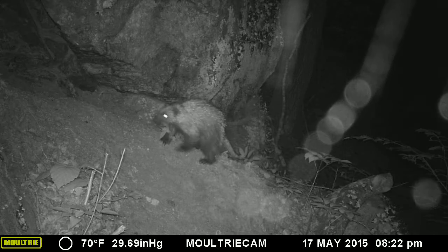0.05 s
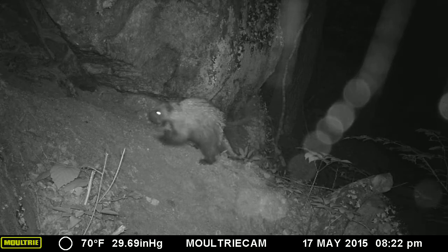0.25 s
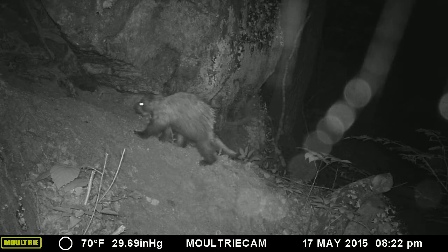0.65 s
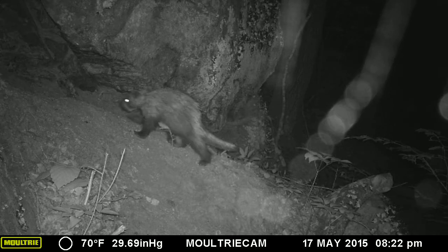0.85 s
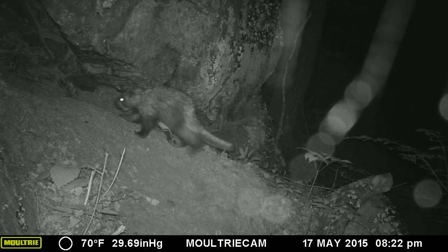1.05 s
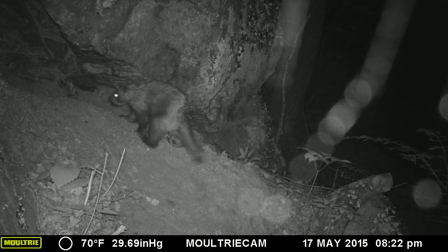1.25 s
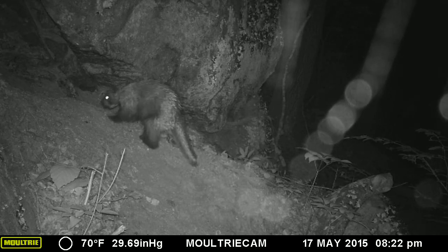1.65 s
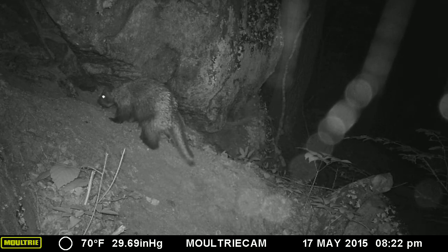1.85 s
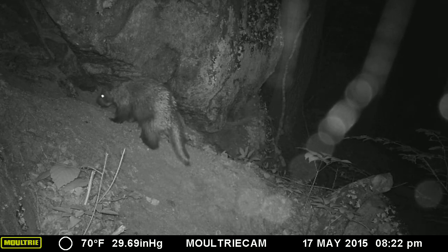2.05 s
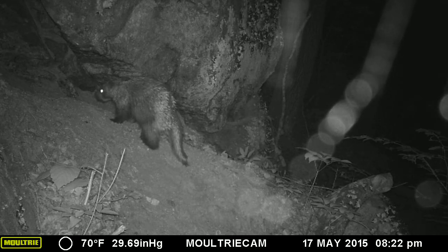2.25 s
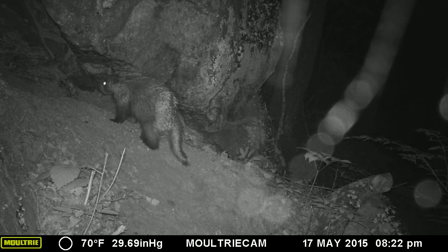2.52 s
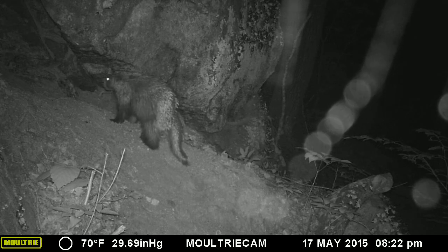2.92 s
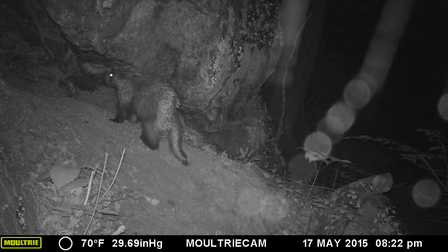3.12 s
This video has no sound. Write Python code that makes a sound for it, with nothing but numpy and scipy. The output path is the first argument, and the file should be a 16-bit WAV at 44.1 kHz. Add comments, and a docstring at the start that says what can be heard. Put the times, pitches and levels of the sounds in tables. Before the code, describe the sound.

One sharp knock on a trail camera's case stands out against quiet night woods. First, a soft buzz of electronic ticks grows for half a second, followed by a few separate clicks until about 0.8 seconds. Thin hiss, faint hollow air, low rumble and a wavering hum fade in by 1 second and stay. The knock lands at about 2.5 seconds, close and slightly overloaded, ringing briefly.

```python
"""A thin hiss and a soft buzz of ticks come first: a trail camera is waking in a still wood at night.
Its amplifier makes the hiss, and ticks each time its gain (how much it boosts the sound) steps up.
Air ringing in the camera's case fades in, along with a rumble and a low hum.
One sharp knock on the case overloads the camera, and its gain control turns everything down briefly."""
import sys
import numpy as np
from scipy import signal
from scipy.fft import rfft, irfft, next_fast_len
from scipy.io import wavfile
from scipy.ndimage import map_coordinates

SR = 44100
rng = np.random.default_rng(int(sys.argv[2]) if len(sys.argv) > 2 else 0)


def generate_wav(sig):
    """Save sig (samples, or channels by samples) to the path in sys.argv[1] as 16-bit PCM at SR."""
    pcm = np.round(np.clip(np.atleast_2d(sig).T, -1, 1) * 32767).astype(np.int16)
    wavfile.write(sys.argv[1], SR, pcm)


N = 143325


def amp(db):
    """Turn decibels into a number to multiply by."""
    return 10 ** (np.asarray(db) / 20)


def curve(points):
    """Join (time_s, value) points with straight lines, one value per sample."""
    return np.interp(np.arange(N) / SR, *np.transpose(points))


def colour(points):
    """Turn (pitch_hz, level_db) points into a function giving each pitch's strength."""
    pitch_hz, level_db = np.transpose(points)
    return lambda hz: amp(np.interp(np.log(hz + 1), np.log(pitch_hz + 1), level_db))


def filtered(x, strength):
    """Multiply each pitch in x by strength(hz)."""
    size = next_fast_len(N + SR // 2)
    return irfft(rfft(x, size) * strength(np.fft.rfftfreq(size, 1 / SR)), size)[:N]


def noise(strength):
    """Noise shaped by strength(hz), with an average power of 1."""
    x = filtered(rng.standard_normal(N), strength)
    return x / np.sqrt(np.mean(x ** 2) + 1e-20)


def wobble(per_s):
    """A smooth curve through per_s random values each second."""
    values = rng.standard_normal(int(N * per_s / SR) + 4)
    return map_coordinates(values, [np.arange(N) * per_s / SR])


def fade(t, fade_s):
    """Jump from 0 to 1 at t = 0, then die away by 60 dB every fade_s."""
    return (t >= 0) * np.exp(-np.log(1000) * np.abs(t) / fade_s)


def hiss():
    """The amplifier's own noise drops out twice, swells and settles."""
    # loudness of the hiss: time_s, level_db
    loudness = [(0, -59), (.125, -88), (.14, -59), (.218, -55.5), (.232, -90), (.255, -84), (.266, -52),
                (.35, -50.5), (.48, -40), (.72, -39.5), (.95, -46), (3.25, -46)]
    # tone of the hiss: pitch_hz, level_db
    tone = [(100, 7.5), (400, 2.5), (900, 3), (1600, -1.5), (3000, 1), (4300, 1), (5200, -0.5)]
    return amp(curve(loudness)) * noise(colour(tone))


def wake_ticks():
    """Each gain step jolts the amplifier's resting level, which settles: a buzz, then single ticks."""
    # single jumps of the gain: start_s, level_db, direction (1 up, -1 down)
    jumps = [(.1339, -34.5, 1), (0.541, -22.5, 1), (0.5836, -25, 1), (0.6474, -25.5, 1), (0.6854, -27, 1),
             (0.7581, -27, 1), (.776, -26, 1), (0.7915, -16.5, -1), (0.8054, -32, 1), (.8354, -31.5, 1)]
    count, gap_s, growth_db_per_s, settle_s = 35, .014222, 52.5, .21
    times_s = .0059 + gap_s * np.arange(count)
    levels_db = -51 + growth_db_per_s * times_s + rng.standard_normal(count)
    steps = np.zeros(N)
    steps[np.round(times_s * SR).astype(int)] = amp(levels_db)
    for start_s, level_db, direction in jumps:
        steps[round(start_s * SR)] += np.sign(direction) * amp(level_db)
    return signal.lfilter([1], [1, -np.exp(-1 / (settle_s * SR))], steps)


def night_air():
    """Faint air noise rings at a few pitches inside the hollow case."""
    # where the hollow case rings: pitch_hz, width_hz, level_db
    peaks = [(1171.6, 186, -9.5), (2067.7, 140, -0.5), (2313, 300, -16), (3552, 278, -15.5)]

    def hollow(hz):
        return np.sqrt(sum(amp(level_db) ** 2 / (1 + (2 * (hz - pitch_hz) / width_hz) ** 2) ** 1.6
                           for pitch_hz, width_hz, level_db in peaks))
    return amp(-38.5 + 1.01 * wobble(per_s=30.09)) * noise(hollow)


def rumble():
    """Deep, steady noise."""
    # tone of the rumble: pitch_hz, level_db
    tone = [(8, 1), (20, -2.5), (30, 0), (48, -11.5), (75, -7), (98, -8.5), (112, -14), (145, -18),
            (175, -24), (260, -31.5), (600, -35), (1000, -43.5), (2000, -76.5)]
    return amp(-27.5) * noise(colour(tone))


def hum():
    """One low note swells and wavers, with a faint electrical hum beside it."""
    # swells of the low note: time_s, relative_level_db
    swells = [(.5, -29.5), (.62, -29), (.75, -30), (.95, -26), (1.24, -28.5), (1.47, -28.5), (1.63, -23.5),
              (1.8, -31), (2.02, -35), (2.1, -31), (2.25, -26), (2.48, -26), (2.56, -30.5), (2.72, -24.5),
              (2.82, -22.5), (2.93, -18.5), (3.06, -26), (3.25, -25)]
    # notes of the electrical hum: pitch_hz, relative_level_db
    electric_notes = [(121, -46.5), (360, -64), (480, -68), (600, -68)]
    low_hz, waver_db = 88.1, 1.75
    t = np.arange(N) / SR
    phase = 2 * np.pi * low_hz * t + .25 * wobble(per_s=8.3)  # the pitch drifts a little
    low_note = amp(curve(swells) + waver_db * wobble(per_s=10)) * np.sin(phase)
    electric = sum(amp(db + waver_db * wobble(per_s=4.2)) * np.sin(2 * np.pi * hz * t)
                   for hz, db in electric_notes)
    return np.sqrt(2) * (low_note + electric)


def knock():
    """A hard tap on the case: it cracks and rings, with a short echo and a longer low boom."""
    # notes the struck case rings with: pitch_hz, relative_level_db, fade_s
    case_notes = [(140, -20, .05), (170, -16.5, .06), (275, -30, .24), (345, -32, .1), (640, -25, .05),
                  (1060, -24, .035), (1210, -6, .042), (1335, -41, .24), (1585, -28, .14), (1795, -26, .11),
                  (2062, -22, .07), (2724, -36, .28), (3192, -45, .42), (3650, -14, .016),
                  (4330, -16, .014), (4818, -44, .24), (5000, -14, .014)]
    # tone of the crack: pitch_hz, level_db
    crack_tone = [(100, -0.5), (400, 12.5), (800, 1.5), (1450, -11), (2000, 4), (2700, -3.5), (3700, 0.5),
                  (4400, 2.5), (5200, 1)]
    # tone of the echo among the trees: pitch_hz, level_db
    echo_tone = [(100, -6.5), (300, 2), (600, -6.5), (800, -5), (1200, -3), (1450, -8.5), (2100, -3.5),
                 (3000, -21), (5200, -24.5)]
    start_s, rise_s, boom_hz, boom_octaves = 2.529, .001, 240, .53
    t = np.arange(N) / SR - start_s
    ring = -sum(amp(db + rng.normal(0, .31)) * fade(t, fade_s) * np.sin(2 * np.pi * hz * t)
                for hz, db, fade_s in case_notes)
    ring *= amp(2) * (1 - np.exp(-np.abs(t) / rise_s))
    crack = amp(-1) * fade(t, fade_s=.015) * noise(colour(crack_tone))
    echo = amp(-21) * fade(t, fade_s=.081) * noise(colour(echo_tone))
    low_noise = noise(lambda hz: np.exp(-.5 * (np.log2((hz + 1) / boom_hz) / boom_octaves) ** 2))
    boom = amp(-24) * fade(t, fade_s=.27) * low_noise
    bass_cut = signal.butter(3, 82, 'hp', fs=SR, output='sos')
    return signal.sosfilt(bass_cut, ring + crack + echo + boom)


def gain_control(x):
    """Loud peaks pull the volume down quickly; it climbs back at a steady rate."""
    limit_db, max_cut_db, react_s, recover_db_per_s = -9.5, 8, .006, 60.5
    without_bass = signal.sosfilt(signal.butter(2, 200, 'hp', fs=SR, output='sos'), x)
    over_db = np.maximum(20 * np.log10(np.abs(without_bass) + 1e-9) - limit_db, 0)
    recovery_db = recover_db_per_s * np.arange(N) / SR
    held_db = np.maximum.accumulate(over_db + recovery_db) - recovery_db  # each peak drains away
    cut_db = np.minimum(held_db, max_cut_db)
    smoothing = np.exp(-1 / (react_s * SR))
    return x * amp(-signal.lfilter([1 - smoothing], [1, -smoothing], cut_db))


def scene():
    """Add all the sounds into the camera's one channel."""
    # the microphone coming alive: time_s, gain_db
    fade_in = [(0, -41.5), (.25, -27.5), (.5, -7.5), (.7, -5.5), (.95, .7), (1.45, -2)]
    electronics = hiss() + wake_ticks()
    background = amp(curve(fade_in)) * (night_air() + rumble() + hum())
    return (electronics + background + knock())[None]


def record(dry):
    """The camera turns loud moments down, dulls the treble and flattens peaks that are too big."""
    # how the camera loses treble: pitch_hz, gain_db
    treble_loss = [(5150, 1), (5400, -5), (5700, -10), (6000, -21), (6300, -45.5), (6800, -84.5)]
    ceiling, top_hz = .76, 16000
    dulled = filtered(gain_control(dry[0]), colour(treble_loss))
    flattened = np.clip(dulled, -ceiling, ceiling)
    return filtered(flattened, lambda hz: 1 / np.sqrt(1 + (hz / top_hz) ** 120))[None]  # steep top cut


dry = scene()
out = record(dry)
generate_wav(out)
```